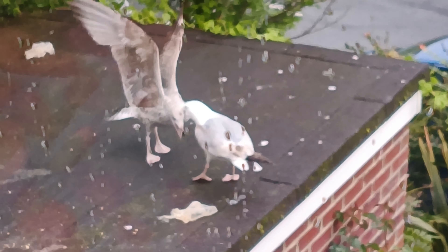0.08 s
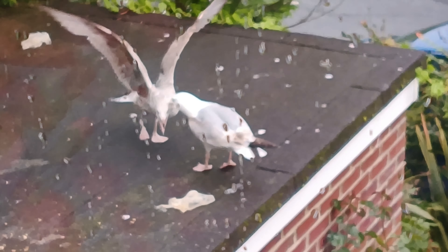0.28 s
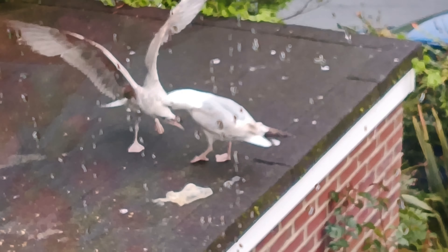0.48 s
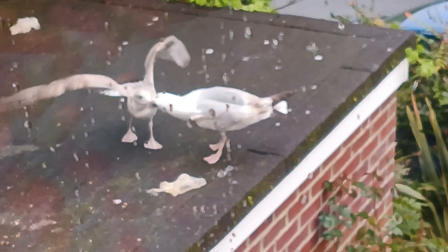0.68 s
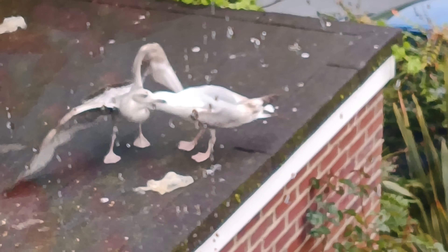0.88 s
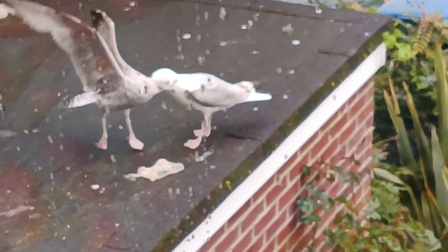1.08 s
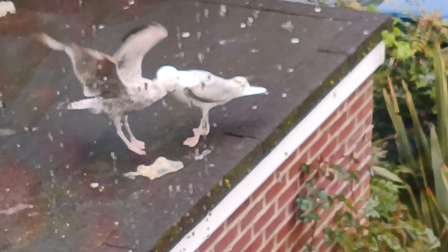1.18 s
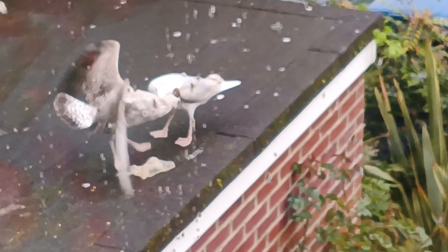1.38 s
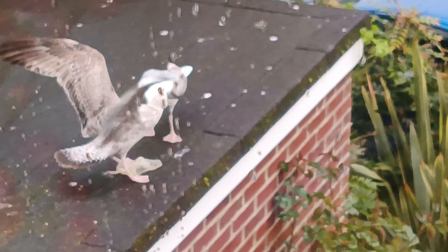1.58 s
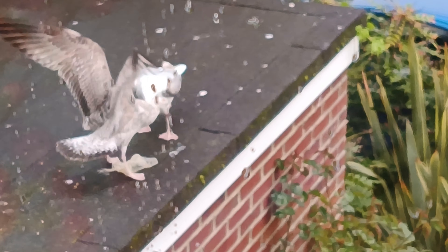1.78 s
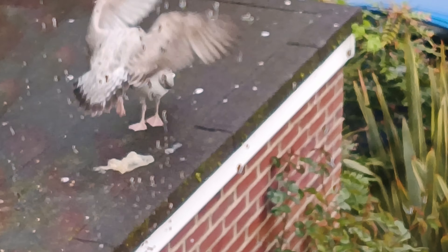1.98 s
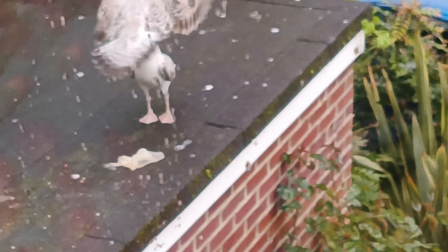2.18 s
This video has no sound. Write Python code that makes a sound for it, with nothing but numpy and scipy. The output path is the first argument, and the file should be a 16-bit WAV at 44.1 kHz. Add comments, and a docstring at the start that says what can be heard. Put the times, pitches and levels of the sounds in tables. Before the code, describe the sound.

A gull squeals loudly from the start, rough and rasping until about 0.3 seconds, then clear and piercing, sliding down and roughening to stop near 0.85. Faint low grunts accompany and follow it. Thin distant bird chirps flicker between 1.07 and 1.35. From 1.35 to 2.2 a weaker squeal begins hoarse, then holds a nearly level pitch. Nearby house walls add short outdoor reflections over faint low town hum.

```python
"""A harsh rasp clears into a long, falling squeal: a gull calling in a tussle on a flat roof among houses.
After a pause comes a second, more level squeal; a syrinx buzz through a throat makes both calls,
with period doubling for the in-between tones and pulsed noise for the rasp. Low buzzes make faint grunts.
Scattered delays are the house walls, bending sine tones a far small bird in the pause,
and shaped noise the faint hum of the town."""
import sys
import numpy as np
from scipy import signal
from scipy.fft import rfft, irfft, next_fast_len
from scipy.io import wavfile
from scipy.ndimage import uniform_filter1d, minimum_filter1d, map_coordinates

SR = 44100
rng = np.random.default_rng(int(sys.argv[2]) if len(sys.argv) > 2 else 0)


def wav_out(sig):
    """Save sig, one row per channel (or a flat mono array), as 16-bit PCM at SR to the path in sys.argv[1]."""
    wavfile.write(sys.argv[1], SR, np.round(np.clip(np.atleast_2d(sig).T, -1, 1) * 32767).astype(np.int16))


N = 97020  # length [samples]
TIME = np.arange(N) / SR  # [s]


def amp(db):
    """Decibels to gain."""
    return 10 ** (np.asarray(db) / 20)


def unit(x):
    """Scale to rms 1."""
    return x / np.sqrt(np.mean(x ** 2) + 1e-20)


def along(points, hz):
    """Read (frequency, value) points on a log frequency axis."""
    f, value = np.transpose(points)
    return np.interp(np.log(hz + 1), np.log(f + 1), value)


def curves(rows):
    """One value per sample for each column after the time."""
    time, *columns = np.transpose(rows)
    return [np.interp(TIME, time, column) for column in columns]


def wobble(rate):
    """A smooth random curve through rate knots a second."""
    knots = rng.standard_normal(int(N * rate / SR) + 4)
    return map_coordinates(knots, [np.arange(N) * rate / SR])


def running_phase(hz):
    """Phase in radians of a tone whose frequency moves from sample to sample."""
    return 2 * np.pi * np.cumsum(hz) / SR


def arch_over(start, length):
    """Half a sine that swells from 0 to 1 and back over one short sound."""
    return np.sin(np.pi * np.clip((TIME - start) / length, 0, 1))


def filtered(x, response):
    """Multiply the spectrum of x by a response of frequency, padded so delays do not wrap early."""
    m = next_fast_len(N + SR // 2)
    spectrum = rfft(x, m) * response(np.fft.rfftfreq(m, 1 / SR))
    return irfft(spectrum, m)[..., :N]


def coloured(x, spectrum):
    """Shape x by a (frequency, dB) spectrum, at rms 1."""
    return unit(filtered(x, lambda hz: amp(along(spectrum, hz))))


# the two calls: (time [s], pitch [Hz], level [dB], period doubling [dB], rasp [dB])
FALLING_CALL = [(0, 1265, -37, 0, -5), (.03, 1275, -34, -11, -2.5), (.05, 1691, -41.5, -10.5, 11),
                (.15, 1693, -38, -12, 9.5), (.175, 1635, -28, -19.5, -1), (.22, 1553, -33, -12, 7),
                (.29, 1509, -18.5, -21, -7.5), (.308, 1498, -38.5, -8, -4.5),
                (.335, 1453, -18.5, -28.5, -16.5), (.37, 1459, -15.5, -12, -24.5),
                (.435, 1456, -11.5, -24.5, -30.5), (.468, 1450, -15.5, -13.5, -18.5),
                (.495, 1438, -14.5, -14, -29.5), (.52, 1406, -24, -16.5, -12),
                (.605, 1372, -18, -19, -15.5), (.67, 1329, -29.5, -5.5, -7),
                (.765, 1303, -18, -16.5, -16.5), (.812, 1246, -32.5, -24.5, -4), (.84, 1218, -45, -2.5, -3)]
LEVEL_CALL = [(1.337, 1181, -57, 0.5, 1.5), (1.355, 1210, -44, 4.5, 1), (1.364, 1210, -36, 3, -1),
              (1.398, 1240, -31.5, -5.5, -7), (1.425, 1228, -40, 3, 9.5), (1.51, 1210, -31.5, -9.5, 0.5),
              (1.56, 1253, -35.5, -3.5, 1.5), (1.612, 1268, -50, 11.5, 3), (1.65, 1280, -33.5, -20, -38),
              (1.695, 1308, -30.5, -16, -25.5), (1.725, 1317, -29, -6, -22.5),
              (1.805, 1300, -21, -27.5, -32), (1.85, 1304, -34, -20.5, -15), (1.92, 1299, -26.5, -34, -34),
              (1.99, 1338, -31, -33, -31.5), (2.055, 1330, -41.5, -32, -25.5),
              (2.08, 1312, -32.5, -54, -20.5), (2.115, 1257, -37, -17, -33.5),
              (2.148, 1242, -43.5, 2, -4.5), (2.2, 1255, -56, -3, -2.5)]
# throat and open bill in each call: (frequency [Hz], gain [dB])
FALLING_THROAT = [(900, -30), (1250, 1.5), (2200, 0.5), (3250, 0), (3600, -8), (3900, 5), (5000, -6.5),
                  (5300, -1.5), (5900, -7.5), (6700, -22.5), (8800, -21.5), (10500, -31), (12000, -43),
                  (15000, -42.5)]
LEVEL_THROAT = [(700, -31), (1200, -0.5), (2650, 1), (3050, -24), (3330, -3), (3950, -1), (4900, -18),
                (5250, -13), (6100, -27.5), (6600, -25.5), (8000, -44), (10400, -36), (12000, -52)]
# spectrum of the rasp in each call: (frequency [Hz], relative level [dB])
FALLING_RASP = [(300, -29), (1150, -30), (1450, -19), (1780, -2.5), (2300, -5.5), (3200, 0.5), (3900, -10),
                (4700, 4), (5500, -1), (6800, -4.5), (8500, -17.5), (10500, -20.5), (12000, -44)]
LEVEL_RASP = [(300, -15.5), (1100, -19), (1350, -9.5), (1600, 9.5), (2050, 14), (2600, 7), (3300, 0.5),
              (4100, 4), (5200, 2.5), (6200, -21.5), (14000, -45.5)]
# voice colour through both calls: (time [s], fundamental gain [dB], treble gain [dB])
VOICE_COLOUR = [(.015, -4, -19), (.14, -4.5, 10), (.18, -8.5, -1), (.29, -17, -5), (.31, 1, 14),
                (.34, -29.5, -7.5), (.435, -30, -13), (.495, -19, -11.5), (.525, -7.5, 0.5), (.69, -8, 2),
                (.765, -11, -9), (.805, -1, 7), (1.36, 10, -1.5), (1.4, 14.5, 6), (1.52, 6, -1),
                (1.65, 10.5, -0.5), (1.695, -9.5, -12), (1.74, -12, -9.5), (1.805, -15.5, -16),
                (1.85, -11.5, 1), (1.92, -2, -4.5), (2.06, 1.5, 9.5), (2.14, 11.5, 7)]
# the treble gain fades in across this range: (start [Hz], end [Hz])
TREBLE_HZ = [3100, 3600]
JITTER, RASP_JITTER = 0.0019, 0.01  # relative pitch scatter when clear, added when harsh
FALLING_GROWL_HZ, LEVEL_GROWL_HZ = 691.7, 346.7  # the low second voice in each rasp
GROWL_JITTER, GROWL_DB = 0.13, 1  # relative pitch scatter; growl against the noise
BURST_DB, BURST_RATE = 2, 170  # uneven bursts of chaos: depth, knots a second
FLUTTER_DB, FLUTTER_RATE = 1.6, 100  # level flutter below the treble (doubled in it), knots a second
DULLING_DB = 15  # loss of the top overtones in a full rasp
DOUBLING_SHIMMER_DB = 5  # the halfway lines are less steady


def gull(call, throat, rasp_colour, growl_hz, count=22):
    """The syrinx buzzes through the throat; period doubling adds halfway lines, a low growl chops the rasp."""
    pitch, level_db, doubling_db, rasp_db = curves(call)
    low_db, treble_db = curves(VOICE_COLOUR)
    harsh = np.minimum(amp(rasp_db), 1)
    scatter = JITTER * wobble(120) + RASP_JITTER * harsh * wobble(500)
    phase = running_phase(pitch * (1 + scatter))

    tone = np.zeros(N)
    for k in range(1, count + 1):  # odd k: halfway lines; even k: overtones of the pitch
        hz = k * pitch / 2
        treble = np.interp(hz, TREBLE_HZ, [0, 1])
        if k % 2:
            gain_db = doubling_db + DOUBLING_SHIMMER_DB * wobble(90)
        else:  # the head shakes: the treble flutters most
            flutter_db = FLUTTER_DB * (1 + treble) * wobble(FLUTTER_RATE)
            gain_db = treble_db * treble + low_db * (k == 2) + flutter_db
        # chaos wipes out the top overtones
        top = np.clip(np.log2(hz / TREBLE_HZ[1]), 0, 1)
        gain_db = gain_db - DULLING_DB * harsh * top
        tone += amp(along(throat, hz) + gain_db) * np.sin(k * phase / 2 + rng.uniform(0, 2 * np.pi))

    pulses = np.cos(phase / 2) ** 20  # one narrow pulse per pitch period
    growl = np.cos(running_phase(growl_hz * (1 + GROWL_JITTER * wobble(400))))
    noise = unit(rng.standard_normal(N) * pulses * (1 + growl))
    chaos = noise + amp(GROWL_DB) * unit(pulses * growl)
    rasp_gain = amp(rasp_db + BURST_DB * wobble(BURST_RATE))
    rasp = rasp_gain * coloured(smeared(chaos), rasp_colour)

    during_call = 1.0 * ((TIME >= call[0][0]) & (TIME <= call[-1][0]))
    sounding = uniform_filter1d(during_call, size=200)  # soft edges
    return sounding * amp(level_db) * (np.sqrt(2) * tone + rasp)


SMEAR_T60_S = 0.025  # time for the smear to fall 60 dB


def smeared(x):
    """Short decaying noise smears each rasp pulse, like scattering off near surfaces; rms 1."""
    t = np.arange(SR // 20) / SR
    smear = rng.standard_normal(len(t)) * amp(-60 * t / SMEAR_T60_S)
    return unit(signal.fftconvolve(x, smear)[:N])


# faint grunts under and between the squeals: (time [s], length [s], pitch [Hz], level [dB])
GRUNTS = [(0.003, 0.24, 699.4, -43), (0.776, 0.044, 263.9, -49.5), (0.908, 0.031, 254, -48.5),
          (1.387, 0.094, 354.4, -53.5)]
# throat for the grunts: (frequency [Hz], relative gain [dB])
GRUNT_THROAT = [(250, -16), (350, 2.5), (720, -4.5), (2600, -5.5), (6000, -24.5)]
GRUNT_JITTER = 0.016  # relative pitch scatter


def grunts(count=14):
    """Soft, unsteady low notes from the struggling gulls: harmonic buzzes shaped by the throat."""
    out = np.zeros(N)
    for start, length, hz, db in GRUNTS:
        phase = running_phase(hz * (1 + GRUNT_JITTER * wobble(200)))
        buzz = sum(amp(along(GRUNT_THROAT, k * hz)) * np.sin(k * phase) for k in range(1, count + 1))
        out += amp(db) * np.sqrt(np.abs(arch_over(start, length))) * unit(buzz)
    return out


# far chirps: (time [s], length [s], pitch [Hz], dip [Hz], level [dB]); a negative dip rises
CHIRPS = [(1.073, 0.061, 5596, 666.5, -59), (1.188, 0.065, 4830, 629.5, -53), (1.3, .045, 4020, -300, -66)]


def small_bird():
    """Thin, fluttering far chirps: single sine tones that bend in pitch and come back."""
    out = np.zeros(N)
    for start, length, hz, dip_hz, db in CHIRPS:
        arch = arch_over(start, length)
        loudness = amp(db + 3.2 * wobble(150)) * np.sqrt(np.abs(arch))
        out += loudness * np.sin(running_phase(hz - dip_hz * arch + 75 * wobble(400)))
    return out


SIDE_WALLS_DB, FRONT_WALLS_DB = -2, -9


def walls(x):
    """Walls ahead reach both microphones alike and make tones waver; side walls arrive in opposite phase."""
    side = amp(SIDE_WALLS_DB) * detour(x)
    return amp(FRONT_WALLS_DB) * detour(x) + np.array([side, -side])


# typical detour by the near walls, its log scatter, spacing of the random detours in frequency
WALL_DELAY_S, WALL_SPREAD, WALL_GRAIN_HZ = 0.016, 0.6, 60


def detour(x):
    """Scattering off near walls: each narrow band takes its own detour, which smears sharp pulses."""
    def response(hz):
        knots = rng.standard_normal(4000)
        scatter = np.interp(hz / WALL_GRAIN_HZ, np.arange(len(knots)), knots)
        delay = WALL_DELAY_S * np.exp(WALL_SPREAD * scatter)
        # phase is the delay summed over frequency; hz[1] is the bin width
        return np.exp(-2j * np.pi * np.cumsum(delay) * hz[1])
    return filtered(x, response)


# decay of the yard's tail: (frequency [Hz], time to fall 60 dB [s])
YARD_DECAY = [(300, 0.36), (1300, 0.54), (3800, 0.5), (12000, 0.067)]
TAIL_DB = -16


def echo(x, t60s):
    """Scattered reflections as decaying noise, different at each microphone, each band dying at its own rate."""
    hz, t, z = signal.stft(rng.standard_normal((2, SR)), SR, nperseg=256)
    decay = amp(-60 * t / along(t60s, hz)[:, None])
    tail = signal.istft(z * decay, SR, nperseg=256)[1]
    return signal.fftconvolve(x, tail / np.linalg.norm(tail[0]), axes=1)[:, :N]


# spectrum of the town: (frequency [Hz], relative level [dB])
TOWN_SPECTRUM = [(25, -3.5), (44, -7.5), (154, -2.5), (278, -18.5), (488, -15.5), (927, -25), (4500, -30.5),
                 (15000, -37)]
# likeness of the two microphones: (frequency [Hz], correlation [1 = mono])
TOWN_ALIKE = [(200, 0.87), (600, 0.33), (2000, 0.12)]
TOWN_DB = -53.5  # rms over both channels


def town():
    """A steady far rumble of shaped noise, nearly mono in the bass."""
    def mid_side(hz):
        turn = np.arccos(np.clip(along(TOWN_ALIKE, hz), -1, 1)) / 2
        return amp(along(TOWN_SPECTRUM, hz)) * [np.cos(turn), np.sin(turn)]
    mid, side = filtered(rng.standard_normal((2, N)), mid_side)
    return amp(TOWN_DB) * unit(np.array([mid + side, mid - side]))


def scene():
    """The birds, the near walls, the yard's longer tail and the town."""
    falling = gull(FALLING_CALL, FALLING_THROAT, FALLING_RASP, FALLING_GROWL_HZ)
    level = gull(LEVEL_CALL, LEVEL_THROAT, LEVEL_RASP, LEVEL_GROWL_HZ)
    birds = falling + level + grunts() + small_bird()
    yard_tail = amp(TAIL_DB) * echo(birds[None], YARD_DECAY)
    return birds + walls(birds) + yard_tail + town()


CEILING, TOP_HZ = 0.87, 15400  # limiter ceiling [full scale 1]; upper band limit


def record(dry):
    """The recorder turns down the loudest peaks toward its ceiling and keeps nothing above its band limit."""
    needed = CEILING / np.maximum(np.abs(dry).max(axis=0), CEILING)
    gain = uniform_filter1d(minimum_filter1d(needed, size=900), size=800)
    return filtered(dry * gain, lambda hz: hz < TOP_HZ)


dry = scene()
out = record(dry)
wav_out(out)
```